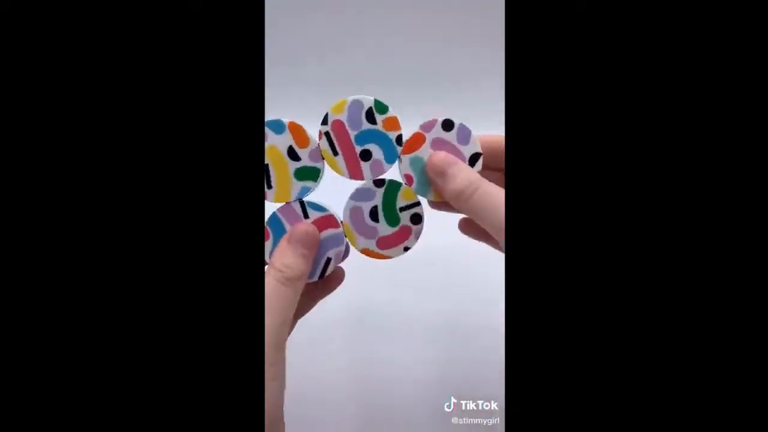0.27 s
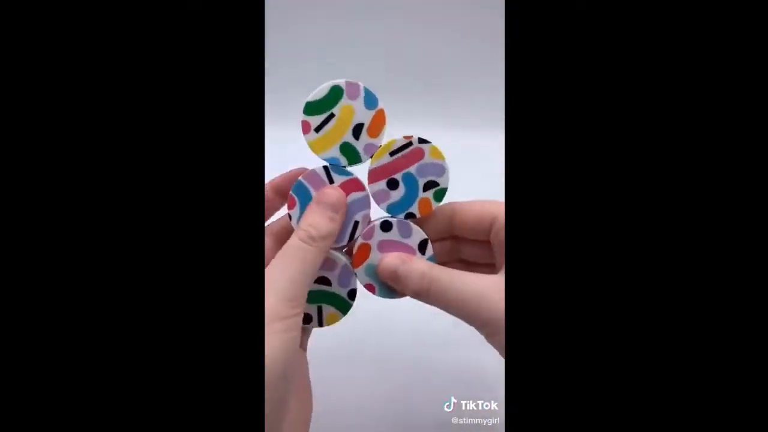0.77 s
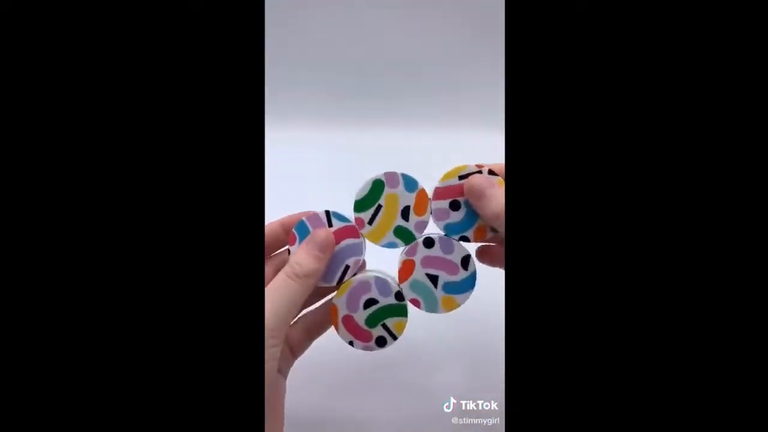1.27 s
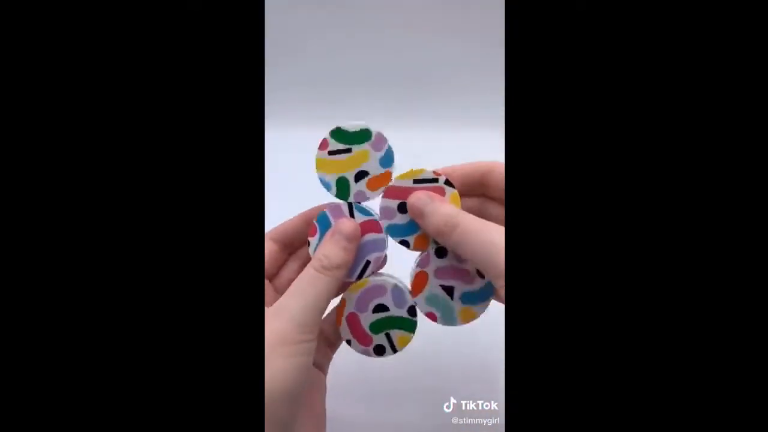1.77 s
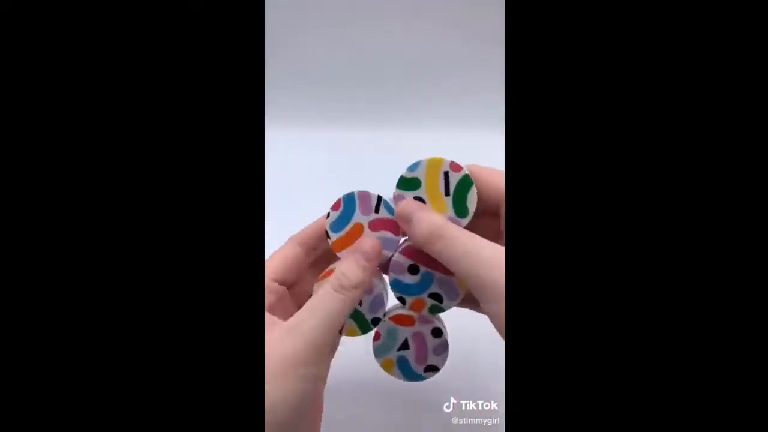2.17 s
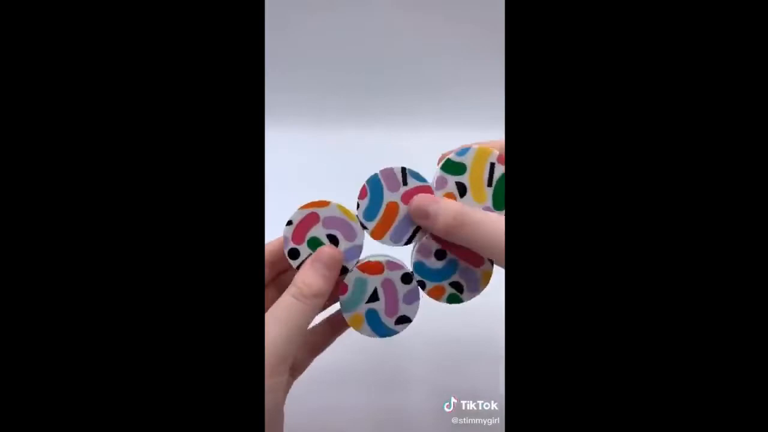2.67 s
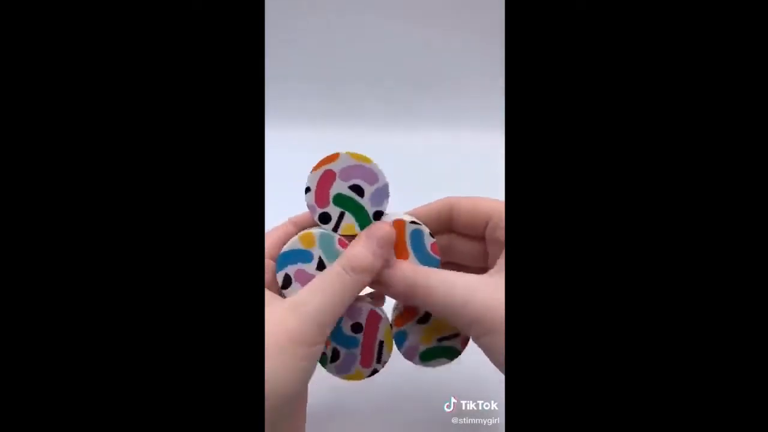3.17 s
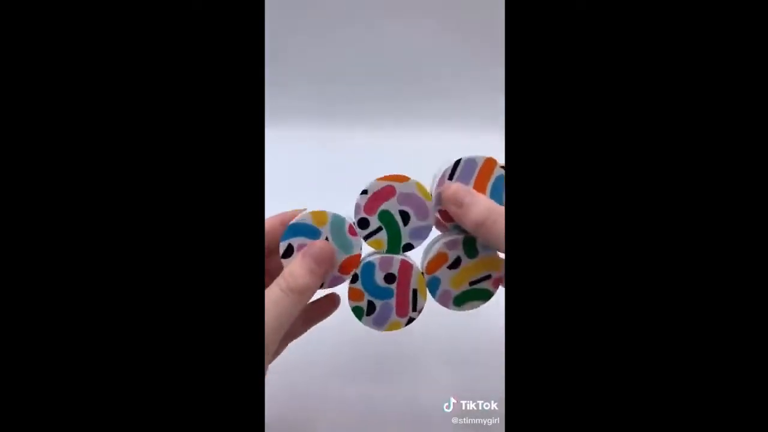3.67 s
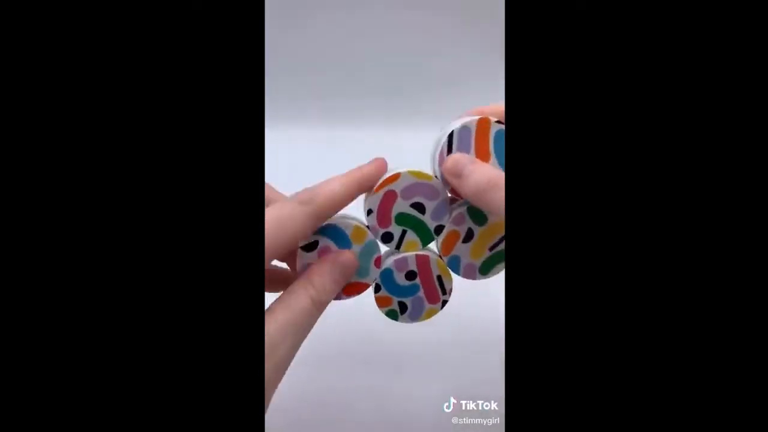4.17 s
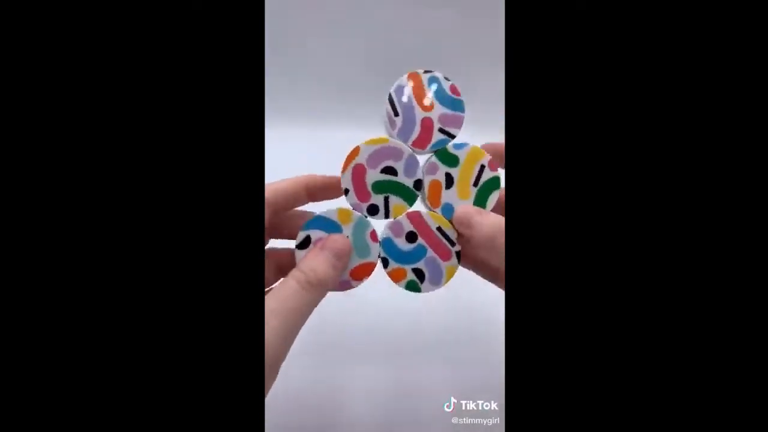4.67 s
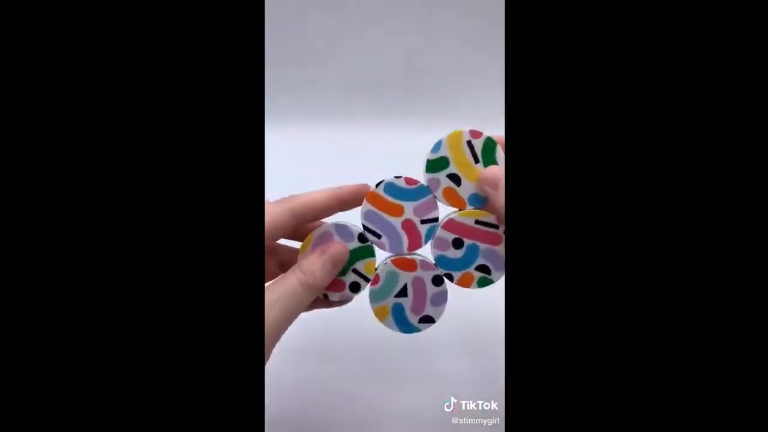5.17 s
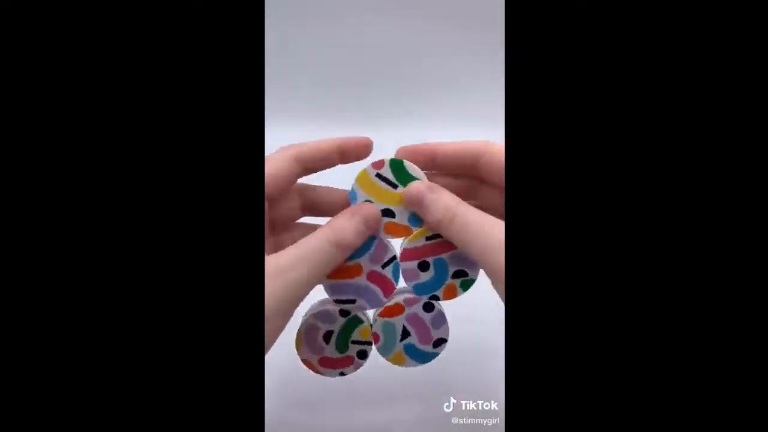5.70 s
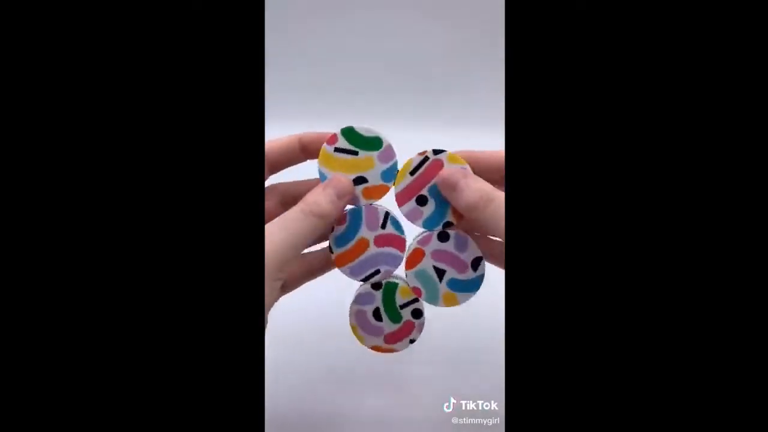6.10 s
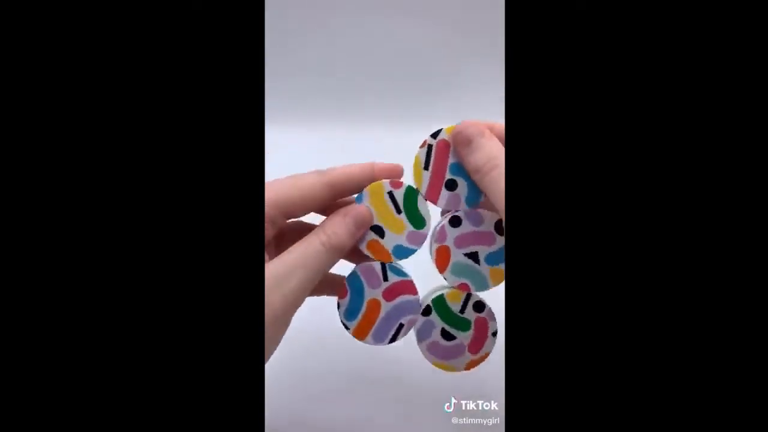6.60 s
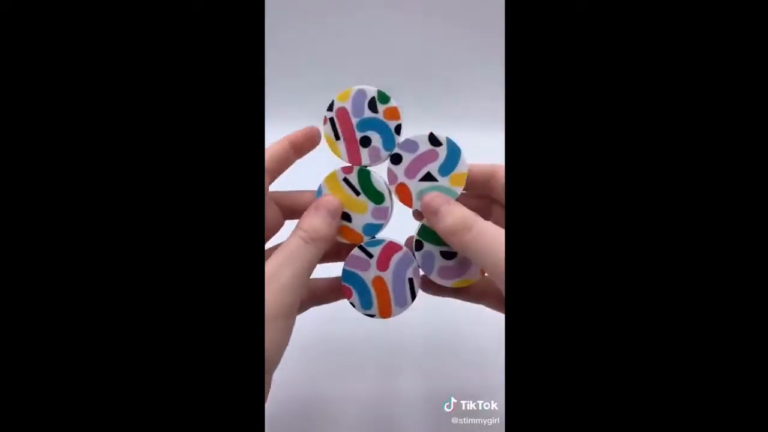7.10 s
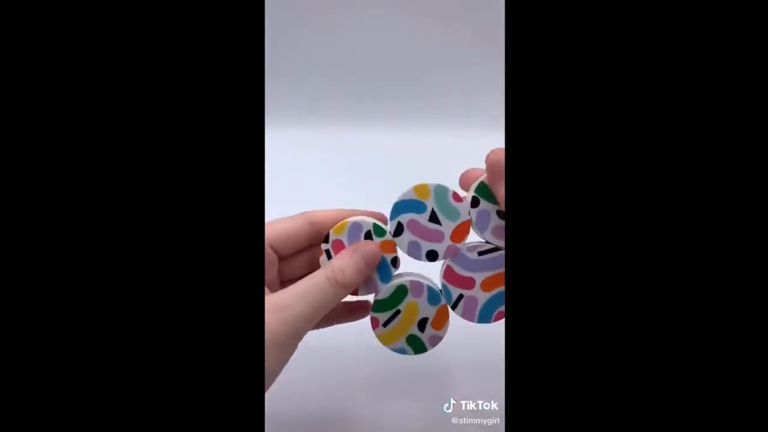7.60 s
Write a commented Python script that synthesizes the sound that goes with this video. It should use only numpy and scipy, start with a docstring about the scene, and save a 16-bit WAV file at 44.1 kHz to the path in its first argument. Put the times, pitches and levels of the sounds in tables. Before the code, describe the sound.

Linked hard plastic discs of a hand toy snap sharply at uneven intervals, with soft grainy sliding and faint ticks between, in a quiet room.

```python
"""In a small quiet room, hands fold a toy of linked hard plastic discs close in front of a phone.
Discs slide with a soft hiss (grainy noise through the discs' tones), then snap into place: a burst
of random contacts rings the same tones. Low damped swings are dull bumps of the hands.
Behind it are a far motor's wavering low tone and a faint rumble of shaped noise.
The phone hears through two microphone ports, clips peaks beyond full scale and cuts the top treble."""
import sys
import numpy as np
from scipy import signal
from scipy.fft import rfft, irfft, next_fast_len
from scipy.io import wavfile
from scipy.ndimage import uniform_filter1d

SR = 44100
rng = np.random.default_rng(int(sys.argv[2]) if len(sys.argv) > 2 else 0)


def to_wav(sig):
    """Store sig (one row per channel, or 1-D mono) as 16-bit WAV at the path in sys.argv[1].

    Samples outside -1..1 are clipped; the rate is SR.
    """
    pcm = np.clip(np.atleast_2d(sig), -1, 1) * 32767
    pcm = np.round(pcm).astype(np.int16)
    wavfile.write(sys.argv[1], SR, pcm.T)  # frames by channels


N = 346185  # length [samples]

# tones (modes) the discs ring with: (pitch [Hz], relative level [dB], time to die away by 60 dB [s])
DISC_MODES = [(210, -6.5, 0.016), (760, -9, 0.022), (1439, -0.5, 0.014), (1600, 0.5, 0.016),
              (1934, -5.5, 0.013), (2207, 1.5, 0.011), (2520, 2, 0.014), (2704, -0.5, 0.018),
              (3210, -3.5, 0.0056), (3390, -5, 0.0073), (3847, 3, 0.0072), (4216, -4, 0.01),
              (5677, -5, 0.016), (6084, -8.5, 0.025), (7640, -11.5, 0.013), (8170, -6.5, 0.029),
              (8584, -0.5, 0.019), (11620, -9, 0.014), (15300, -6.5, 0.027), (14800, -13, 0.045)]


def snaps():
    """Each snap is a growing slip, a blow and a dying rattle that hit the modes a little differently."""
    # blows and ticks: (time [s], face level [dB], rim level [dB], link level [dB], edge level [dB],
    # mode hit hardest [Hz], time for the rattle to die away by 60 dB [s])
    snap_table = [(0.1736, -15.5, -13.5, -18.5, -7, 2470, 0.03), (0.182, -31.5, -28, -27, -17, 3430, 0.04),
                  (0.573, -47, -61.5, -58, -53, 1430, 0.11), (0.595, -45.5, -41, -40.0, -45, 2980, 0.039),
                  (0.615, -13.5, -12.5, -19, -13, 2260, 0.021), (0.701, -18, -20, -17, -13, 1380, 0.037),
                  (0.954, -53, -46, -56, -48, 3820, 0.077), (1.089, -63, -59.5, -58.5, -51.5, 3060, 0.054),
                  (1.1733, -33.5, -34, -48, -42.5, 1570, 0.033), (1.22, -43, -43.5, -42.5, -47, 3740, 0.08),
                  (1.25, -15, -12.0, -15.5, -8.5, 3260, 0.039),
                  (1.599, -16.5, -16, -23, -16.0, 2240, 0.029), (2.1846, -47, -51.5, -53, -43, 1540, 0.03),
                  (2.233, -48.5, -54, -59, -47, 1570, 0.031), (2.3651, -35.5, -34, -33, -31.5, 1420, 0.048),
                  (2.3976, -36, -35, -39.5, -39.5, 2190, 0.046),
                  (2.557, -42.5, -41.5, -51, -40, 3690, 0.074), (2.869, -37, -43.5, -45, -35, 2160, 0.028),
                  (2.932, -48.5, -50, -70, -60, 3000, 0.043),
                  (3.5739, -22.5, -13.5, -18.5, -16, 3310, 0.025),
                  (3.583, -32, -28.5, -32.5, -31, 3710, 0.03),
                  (3.597, -38.0, -28.5, -30, -24.5, 4200, 0.036),
                  (3.867, -37, -31, -36.5, -43, 3790, 0.046), (3.907, -34, -35.0, -34.5, -30.5, 1390, 0.02),
                  (4.2087, -56.5, -62.0, -70.5, -73, 1510, 0.037),
                  (4.5955, -68, -59.5, -49.5, -59, 2750, 0.023),
                  (4.6226, -56, -47.5, -48.5, -48, 3570, 0.023), (4.677, -67, -57.5, -73, -48, 3200, 0.023),
                  (4.8932, -59.0, -60, -59, -49.5, 1460, 0.05),
                  (5.1632, -16.5, -12.5, -16, -7, 1890, 0.054), (5.174, -29, -22, -25, -18.0, 3170, 0.04),
                  (5.2147, -32, -18, -28.5, -22.5, 3180, 0.033),
                  (5.224, -29.5, -29.5, -30.0, -28.5, 1420, 0.04),
                  (5.617, -65.5, -53.5, -57, -53.5, 2990, 0.019),
                  (5.7797, -40.5, -38, -47, -41, 3190, 0.042), (5.844, -49.5, -50, -63, -61, 3070, 0.034),
                  (6.037, -50.5, -39.5, -47.5, -46, 3870, 0.032),
                  (6.104, -57, -57, -60.0, -57.5, 1410, 0.04),
                  (6.7114, -15.5, -19.5, -26.5, -19.5, 2130, 0.025),
                  (6.716, -30.5, -32, -32.5, -23, 1890, 0.04), (6.986, -46.5, -57, -59.5, -57, 1350, 0.03),
                  (7.226, -31, -36.5, -44.5, -35, 1390, 0.039),
                  (7.275, -40.5, -38, -53, -42.5, 1430, 0.025), (7.433, -44, -46, -58, -39, 1390, 0.03),
                  (7.441, -34, -38, -40.5, -35, 1380, 0.064), (7.623, -32, -31.5, -36, -28, 2516, 0.041)]
    contacts_per_s = 4500
    slip_db, slip_rise_s = -17.5, 0.0058  # level just before the blow; time to grow by a factor e
    crowd_t60_s = 0.01
    body_db, favoured_db = -18.5, 10  # hollow body under the face; lift of the modes a blow lands on
    # weaker blows are softer contacts: the treble cut sinks with the level
    soft_cut_hz, soft_cut_db_per_db = 37000, 0.53
    lead, start = 1024, int(.006 * SR)  # samples before the blow; levels are those of the first 6 ms
    out = np.zeros(N + 8192)
    t = np.arange(-lead, 3072) / SR
    after = t[lead:2 * lead]
    mode_hz = np.array(DISC_MODES)[:, :1]
    for s, *levels_db, hardest_hz, length in snap_table:
        levels_db = [levels_db[0] + body_db] + levels_db
        lift_db = favoured_db * np.exp(-(np.log(mode_hz / hardest_hz) / 0.047) ** 2)
        contact = (rng.random(len(t)) < contacts_per_s / SR) * rng.standard_normal(len(t))
        contact[lead] = 2.2  # the blow itself
        growing = undb(slip_db) * np.exp(-np.abs(t) / slip_rise_s)
        dying = np.exp(-np.log(1000) * np.abs(t) / max(length, .003))
        contact *= np.where(t < 0, growing, dying)
        # chance shifts the strength and pitch of every mode
        chance = rng.standard_normal((2, len(DISC_MODES), 1))
        gain = undb(lift_db + 2.5 * chance[0])
        detune = 1 + .013 * chance[1]
        crowd = rng.standard_normal(len(after)) * np.exp(-np.log(1000) * after / crowd_t60_s)
        parts = signal.fftconvolve(contact[None], ring(gain, detune, crowd))
        cut_hz = min(soft_cut_hz * undb(soft_cut_db_per_db * max(levels_db)), .45 * SR)
        parts = signal.lfilter(*signal.butter(2, cut_hz, fs=SR), parts)
        part_gain = undb(levels_db) / np.std(parts[:, lead:lead + start], axis=1)
        hit = part_gain @ parts
        i = int(s * SR) - lead
        out[i:i + len(hit)] += hit
    return out[:N]


def ring(gain, detune, crowd):
    """Ringing of body, face, rim, links and edge after one tap: strong modes over a crowd of small ones."""
    # borders between body, face, rim, links and edge: [Hz]
    group_hz = [90, 1180, 2800, 4800, 7000, 16000]
    # crowd level in each of the five groups: [dB]
    crowd_db = [6.2, 8.1, 2, 3.9, 1.3]
    hz, mode_db, t60 = np.transpose(DISC_MODES)[:, :, None]
    t = np.arange(len(crowd)) / SR
    fading = np.exp(-np.log(1000) * t / t60)
    modes = gain * undb(mode_db) * np.sin(2 * np.pi * hz * detune * t) * fading
    parts = []
    for lo, hi, db in zip(group_hz, group_hz[1:], crowd_db):
        inside = (hz[:, 0] > lo) & (hz[:, 0] < hi)
        parts.append(band(modes[inside].sum(axis=0) + undb(db) * crowd, lo, hi))
    return np.array(parts)


def slide():
    """Grainy friction noise in the same discs; the small modes blur into an even hiss."""
    gain, bright_db = strokes()
    grains = undb(3.2 * np.minimum(rng.exponential(size=N), 5))
    flutter = undb(2.6 * walk(80) + 1.2 * walk(300))
    rub = rng.standard_normal(N) * grains * flutter
    even = undb(15.5) * signal.unit_impulse(1024)
    parts = (unit(p[:N]) for p in signal.fftconvolve(rub[None], ring(0.58, 1., even)))
    # the grip shifts the colour all the time
    body, face, rim, links, edge = (p * undb(1.9 * walk(24)) for p in parts)
    edge = signal.lfilter(*signal.butter(1, 7000, fs=SR), edge)  # friction is duller than a blow
    dull = undb(-bright_db - 11.0) * (undb(-18) * body + face)
    middle = undb(-10.5) * rim + undb(-13) * links
    bright = undb(bright_db - 6.0) * edge
    return gain * (undb(-10) * catches(rub) + dull + middle + bright)


def strokes():
    """Friction gain and brightness: every stroke swells and fades by one law over a faint rest level."""
    # discs and fingers sliding: (time of the peak [s], friction gain [dB], swell over 20 dB [ms],
    # fade over 20 dB [ms], brightness: edge raised and face lowered by [dB])
    stroke_table = [(0.039, -53.5, 250, 170, -2), (.15, -35, 96, 150, 2.5), (0.469, -54.5, 315, 160, 5),
                    (.78, -49.5, 290, 99, -4.5), (0.961, -42, 38, 62, -2.5), (1.139, -46.5, 120, 980, -0.5),
                    (1.568, -38, 155, 140, 4), (1.86, -47, 91, 340, 4.5), (2.03, -51, 280, 40, -6),
                    (2.21, -45, 67, 36, -0.5), (2.421, -53.5, 96, 240, -2), (2.55, -40, 34, 78, 3),
                    (2.695, -41, 40, 90, 3.5), (2.748, -41, 84, 18, -3.5), (2.95, -49, 290, 290, 0),
                    (3.11, -41, 75, 123, 0), (3.239, -46.5, 56, 124, 1), (3.322, -45, 170, 44, 2),
                    (3.472, -41.5, 36, 220, 5.5), (3.548, -38.5, 108, 97, 4), (3.86, -56.5, 184, 370, 6),
                    (4.1, -43.5, 40, 45, 3), (4.45, -49, 73.5, 76, -3), (4.65, -47.5, 31, 48, 0),
                    (4.781, -52.5, 75, 55, -1), (5.14, -30, 67, 182, 0.5), (5.639, -53.5, 93, 71, -7),
                    (5.781, -45, 16, 135, -5), (6.032, -41.5, 37, 35, -4), (6.15, -60, 490, 310, 3.5),
                    (6.31, -54.5, 62, 180, 3.5), (6.59, -50.5, 110, 70, 2.5), (6.681, -43.5, 40, 150, 1.5),
                    (6.849, -51.5, 57, 30, -2.5), (6.99, -45, 66, 63, 0), (7.071, -46, 126, 32, 0.5),
                    (7.224, -32, 9.2, 32, 1), (7.36, -51, 90, 70, 7.5), (7.433, -49, 16, 114, 5),
                    (7.557, -38, 48, 117, 3), (7.84, -49, 40, 100, -5.5)]
    roundness, rest_db = 1.11, -68.5  # 1 = pointed top, 2 = round top; hands never lie quite still
    t = np.arange(N) / SR
    power, bright = undb(rest_db) ** 2, 0
    for s, db, swell, fade, bright_db in stroke_table:
        away = 1000 * np.abs(t - s) / np.where(t < s, swell, fade)
        stroke = undb(db - 20 * np.minimum(away, 9) ** roundness) ** 2
        power = power + stroke
        bright = bright + stroke * bright_db
    return np.sqrt(power), bright / power  # the stronger stroke decides the brightness


def catches(rub):
    """Single modes from 1.2 to 9 kHz catch and let go, singing out of the friction on their own."""
    wander_db = 13
    total = 0
    for hz, db, _ in DISC_MODES:
        if 1200 < hz < 9000:
            singing = signal.lfilter(*signal.iirpeak(hz, 14, fs=SR), rub)
            total = total + undb(db + wander_db * walk(22)) * singing
    return unit(total)


def bumps():
    """A dull bump as the hands jolt: a short, low, damped swing."""
    # jolts: (time [s], strength of the push before damping [dB])
    bump_table = [(0.18, -37.5), (0.618, -47), (0.712, -32), (1.25, -39.5), (1.611, -37), (2.373, -39.5),
                  (2.551, -39), (3.579, -39), (5.169, -49), (5.789, -32.5), (6.039, -36), (7.807, -43.5)]
    swing_hz, t60_s = 74, 0.04
    pushes, t = np.zeros(N), np.arange(SR // 4) / SR
    s, db = np.transpose(bump_table)
    pushes[(s * SR).astype(int)] = undb(db)
    swing = np.sin(2 * np.pi * swing_hz * t) * np.exp(-np.log(1000) * t / t60_s)
    return signal.fftconvolve(pushes, swing)[:N]


def hum():
    """A far motor: one wavering low tone that swells, drops in pitch and fades."""
    # course of the tone before it wavers: (time [s], pitch [Hz], rms level [dB])
    hum_table = [(1.7, 141, -69), (1.9, 142.1, -52.5), (2.55, 141, -48.5), (2.9, 141.2, -53),
                 (2.98, 142, -73), (3.08, 141, -51.5), (3.58, 140.6, -47), (3.72, 140.5, -51),
                 (3.8, 125.8, -48), (4.2, 125.5, -50), (4.32, 129.5, -56), (4.45, 131.3, -49.5),
                 (4.75, 129.9, -52.5), (5.4, 122.2, -56.5), (5.9, 127.7, -60.5), (6.2, 124, -63)]
    hz, db = curve(hum_table)
    loudness = np.sqrt(2) * undb(db + 1.6 * walk(23))
    turns = np.cumsum(hz + .5 * walk(17)) / SR
    return loudness * np.sin(2 * np.pi * turns)


def rumble():
    """Low room noise, most alike at both ports in the bass; bass and upper part swell partly together."""
    # tone colour: (frequency [Hz], relative level [dB])
    colour = [(18, -54.5), (30, -19), (75, 0), (108, -7.5), (143, -2), (184, -5), (237, -12), (315, -6),
              (354, -15), (443, -15.5), (507, -26.5), (703, -29), (1050, -43.5), (1360, -74)]
    # part unrelated between the ports: (frequency [Hz], size against the shared part [ratio])
    unlike = [(60, .14), (150, 0.18), (300, 0.34), (600, 0.82)]
    level_db = -51 + np.array([[.3], [-.3]])  # left, right
    hz = np.fft.rfftfreq(N, 1 / SR)
    mid, side = rfft(rng.standard_normal((2, N)))
    pair = mid + on_log_hz(unlike, hz) * side * np.array([[1], [-1]])
    pair = pair * undb(on_log_hz(colour, hz))
    swell_db = 2.1 * walk(7)
    bass = irfft(pair * (hz < 110), N) * undb(swell_db + 1.5 * walk(5))
    upper = irfft(pair * (hz >= 110), N) * undb(swell_db + 1. * walk(4))
    return undb(level_db) * unit(bass + upper)


def tail(db, channels):
    """Dense wall echoes, made of noise that builds up within a few ms and dies away."""
    t60_s = 0.14
    t = np.arange(int(.5 * SR)) / SR
    shape = np.exp(-np.log(1000) * t / t60_s) * (1 - np.exp(-t / 0.00067))
    return undb(db) * rng.standard_normal((channels, len(t))) * shape / np.sqrt(np.sum(shape ** 2))


def ports(x):
    """Left port hears x as it is; the right has its timing shifted with pitch and is a little coloured."""
    # how far the right port lags, below zero where it leads: (frequency [Hz], lag [cycles])
    right_lag = [(0, 0), (600, -.07), (1000, -.06), (1500, 0), (1900, .12), (3600, .27), (4600, .5),
                 (6200, .92), (7200, 1.05), (8900, 1.5), (10300, 1.97), (11600, 2.05), (13100, 2.5),
                 (14600, 2.97)]
    # colour of the right port: (frequency [Hz], boost [dB])
    right_boost = [(300, -0.4), (700, 0), (2000, 2), (4400, 0), (12000, -0.5)]
    size = next_fast_len(N)
    hz = np.fft.rfftfreq(size, 1 / SR)
    cycles = np.interp(hz, *np.transpose(right_lag))
    path = undb(on_log_hz(right_boost, hz)) * np.exp(-2j * np.pi * cycles)
    right = irfft(rfft(x, size) * path, size)[:N]
    return np.array([x, right])


def undb(db):
    """Turn decibels into a plain gain."""
    return 10 ** (np.asarray(db) / 20)


def unit(x):
    """Scale to rms 1."""
    return x / np.sqrt(np.mean(x ** 2))


def curve(table):
    """Columns of a time table, one value a sample."""
    s, *columns = np.transpose(table)
    return [np.interp(np.arange(N) / SR, s, c) for c in columns]


def on_log_hz(table, hz):
    """Read a (frequency, value) table on a log axis."""
    f, value = np.transpose(table)
    return np.interp(np.log(hz + 1), np.log(f), value)


def walk(rate):
    """Slow random wander of rms 1: random levels held 1 / rate seconds and smoothed twice."""
    k = int(SR / rate)
    held = rng.standard_normal(size=2048)[np.arange(N) // k % 2048]
    return unit(uniform_filter1d(uniform_filter1d(held, k), k))


def band(x, lo_hz, hi_hz):
    """Steep band-pass: keep what lies between two frequencies."""
    return signal.sosfilt(signal.butter(4, [lo_hz, hi_hz], "band", fs=SR, output="sos"), x)


def scene():
    """Toy and its echoes at both ports, over bumps, hum and rumble."""
    toy = snaps() + slide()
    near = toy + signal.fftconvolve(toy, tail(-17, channels=1)[0])[:N]
    # duller echoes from the sides differ between the ports, and so do a few bright ones
    apart = signal.fftconvolve(band(toy, 210, 3600)[None], tail(-9, channels=2))[:, :N]
    glint = signal.fftconvolve(band(toy, 5000, 17000)[None], tail(-15, channels=2))[:, :N]
    return ports(near + hum() + bumps()) + apart + glint + rumble()


def record(dry):
    """The phone clips peaks beyond full scale and cuts the top treble."""
    top_hz = 15700
    cut = signal.ellip(8, .2, 60, top_hz, fs=SR, output="sos")
    clipped = np.clip(dry, -1, 1)
    return np.clip(signal.sosfilt(cut, clipped), -1, 1)


dry = scene()
out = record(dry)
to_wav(out)
```